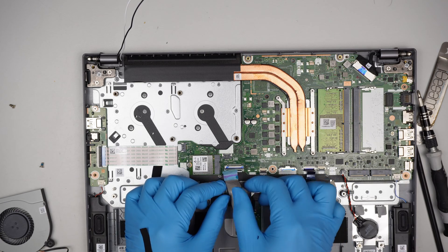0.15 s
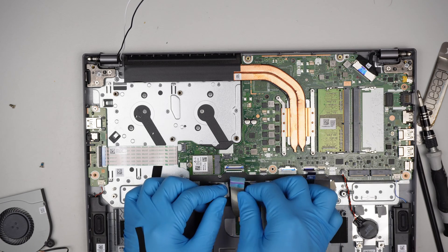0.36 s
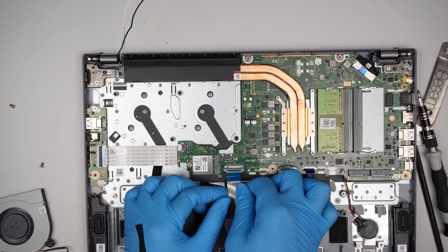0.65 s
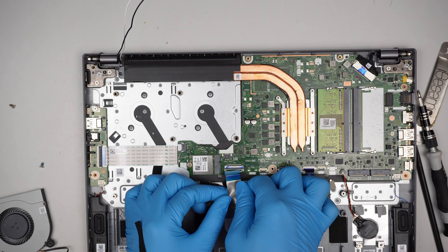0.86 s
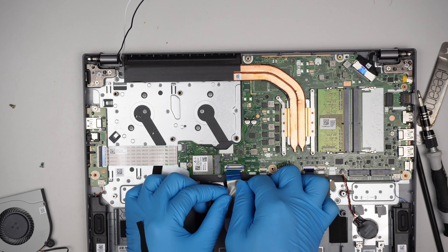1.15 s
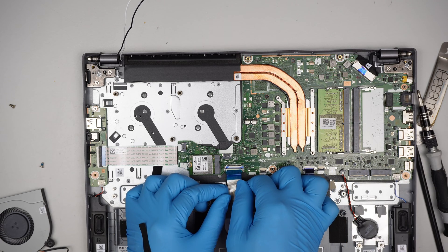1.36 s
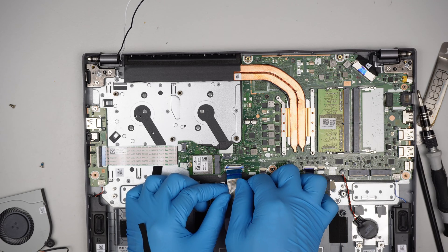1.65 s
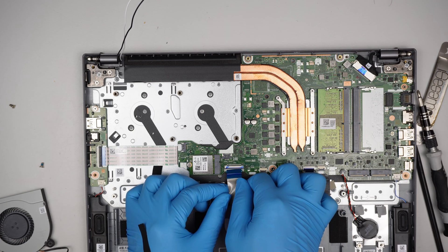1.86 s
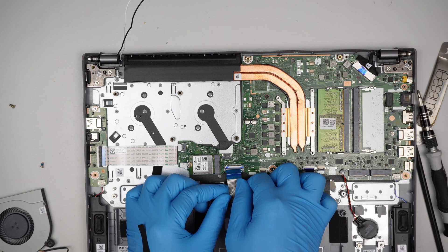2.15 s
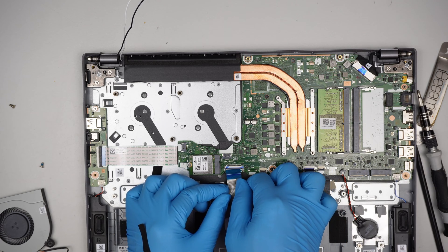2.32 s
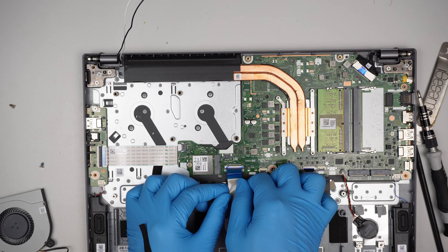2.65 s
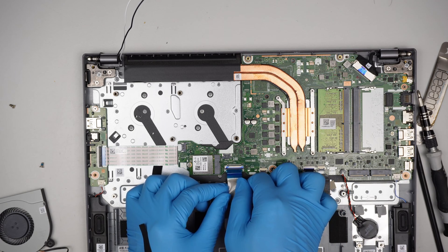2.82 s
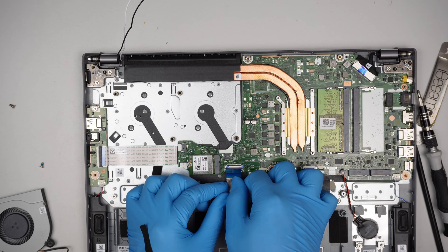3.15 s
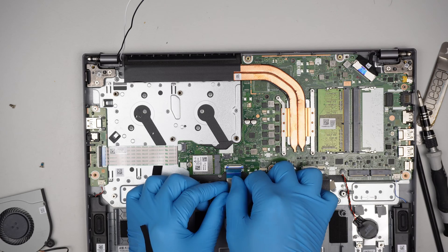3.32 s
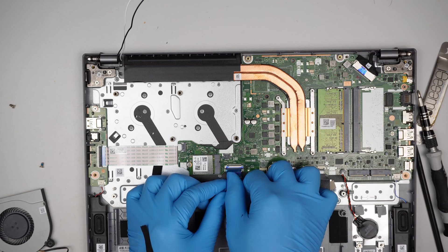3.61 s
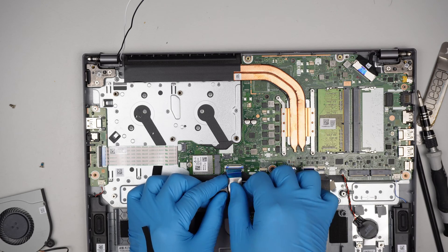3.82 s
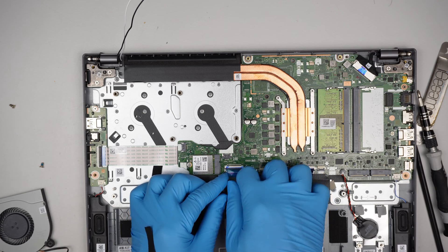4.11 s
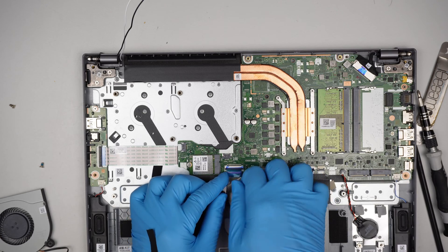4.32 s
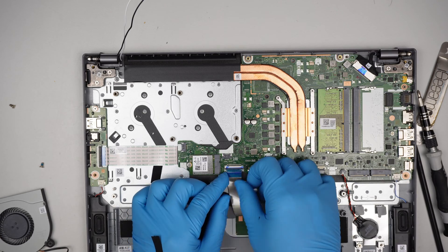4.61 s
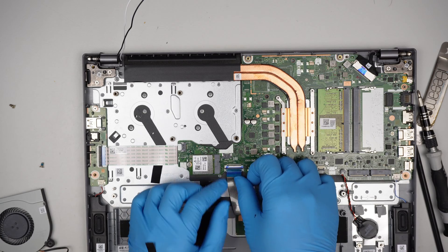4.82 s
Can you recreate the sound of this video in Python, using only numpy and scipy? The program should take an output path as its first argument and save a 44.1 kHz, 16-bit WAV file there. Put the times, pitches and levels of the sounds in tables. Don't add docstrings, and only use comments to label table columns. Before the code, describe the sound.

Close stereo handling of a flat cable on a circuit board in a small, quiet room. A quick flurry of plastic ticks and glove scuffs starts it, then a short creak, then mostly quiet with tiny clicks. A latch snaps near two seconds. After faint pressing, scraping and a hard click come near four seconds, and a dense cluster of snaps, slips and thin squeaks ends it. A low motor hum pulses unevenly underneath.

```python
import sys
import numpy as np
from scipy import signal
from scipy.io import wavfile
from scipy.ndimage import uniform_filter1d

SR = 44100
rng = np.random.default_rng(int(sys.argv[2]) if len(sys.argv) > 2 else 0)


def level_to_linear(level):
    exponent = np.asarray(level, float) / 20
    return 10 ** exponent


def unload_audio(sound):
    columns = np.transpose(np.atleast_2d(sound))
    steps = np.round(np.clip(columns, -1, 1) * 32767)
    wavfile.write(sys.argv[1], SR, steps.astype(np.int16))


N = 219221
LEFT_RIGHT = np.array([[1], [-1]])

# (pitch_hz, level_db_per_hz)
HUSH_COLOUR = [(400, -1), (640, -9), (900, -5), (2000, -14), (3600, -18), (7000, -37), (16000, -40)]
# (pitch_hz, t60_s, level_db)
ROOM_TAIL = [(711, 0.72, -23.5), (1300, 0.46, -25.5), (2602, 0.37, -31), (4240, 0.16, -32.5),
             (6600, 0.2, -35), (10800, 0.26, -28)]
# (start_s, rustle_db)
PALM_WEIGHT = [(0.0, -78.5), (0.23, -73.5), (0.64, -74.5), (1.15, -90.5), (1.27, -70.5), (1.3, -79.5),
               (1.99, -81.5), (2.23, -70.5), (2.32, -77.5), (3.46, -76.5), (3.5, -72), (3.71, -77.5),
               (3.81, -64.5), (4.06, -73.5), (4.57, -61.5), (4.58, -68), (4.96, -63), (4.97, -74)]
# (peak_s, peak_db, ring_hz)
DESK_KNOCKS = [(0.25, -57.5, 230), (0.387, -56.5, 215), (0.549, -64, 330), (0.697, -59, 231.5),
               (1.269, -60.5, 350), (1.407, -67, 629), (1.647, -66.5, 760), (2.778, -66.5, 360),
               (3.113, -63.5, 859), (3.507, -52, 233.5), (3.623, -58.5, 323.3), (.02, -56.5, 877),
               (0.048, -59.5, 988), (4.38, -59, 800), (4.552, -62.5, 792), (4.581, -60, 790),
               (4.948, -47.5, 934),
               (0.383, -59, 207), (0.542, -65, 303), (0.616, -62, 172), (0.691, -64, 214.8),
               (1.264, -58, 363), (1.606, -65, 171.4), (2.157, -56, 171), (2.228, -58, 205),
               (2.542, -62, 172), (2.687, -61, 228.6), (3.012, -65, 191), (3.361, -67, 180),
               (3.504, -54, 240.5), (3.572, -62, 358), (3.732, -63, 372), (3.787, -65, 172.6),
               (3.855, -56.5, 377), (4.093, -66, 386), (4.253, -54.5, 183), (4.393, -55, 186),
               (4.453, -58, 183), (4.508, -52.5, 194), (4.619, -61, 172), (4.76, -59, 213),
               (4.818, -56.5, 347), (4.873, -66, 171.6)]
# (peak_s, peak_db, rise_ms, fall_ms); rise and fall span 20 dB
HUM_SWELLS = [(.29, -49, 38, 190), (.495, -49.5, 105, 134), (.87, -47.5, 470, 75), (.93, -67, 34, 450),
              (1.22, -49.5, 77, 150), (1.42, -38.5, 51, 79), (1.52, -52, 220, 370), (1.73, -46.5, 140, 105),
              (1.94, -45.5, 73, 113), (2.16, -38.5, 98, 280), (2.27, -36, 170, 92), (2.5, -42.5, 190, 87),
              (2.69, -50, 193, 74), (2.86, -43, 79, 180), (2.96, -44.5, 160, 170), (3.06, -41.5, 166, 165),
              (3.22, -45.5, 168, 110), (3.43, -48, 320, 88), (3.59, -50.5, 120, 250), (3.81, -43, 120, 330),
              (3.98, -38.5, 320, 160), (4.12, -38.5, 57, 290), (4.26, -43, 130, 650),
              (4.42, -40.5, 930, 130), (4.56, -40, 930, 200), (4.71, -38, 960, 130),
              (4.87, -40.5, 65, 1000), (4.97, -38.5, 400, 200)]
# (multiple, level_db)
HUM_OVERTONES = [(1, -15.5), (3, -0.5), (4, -5), (5, -17), (6, -23)]
# (peak_s, lift_db, width_ms)
HUM_OPENINGS = [(0.513, 12.5, 5.6), (0.554, 9, 14.6), (1.411, 2, 8.1), (1.791, 10.5, 4.4),
                (2.691, 11.5, 6.2), (2.847, 9, 5.8), (2.881, 10, 8.1), (2.98, 8, 6.3), (3.047, 11, 7),
                (3.237, 7.5, 4.7), (4.261, 6, 5.6), (4.522, 11, 2.1)]
# (pitch_hz, width_hz, level_db)
LOW_MODES = [(730, 200, -6.5), (970, 220, 0.5), (1250, 100, 2.5), (1496, 190, 1.5)]
CHASSIS_MODES = [(1750, 300, -5), (2020, 220, 0), (2280, 260, -3)]
MID_MODES = [(2850, 520, -2), (3500, 550, -4), (4080, 450, -1), (4850, 600, -2), (5800, 750, -5),
             (6750, 650, -7), (7650, 600, -12)]
HIGH_MODES = [(6800, 3000, 4.5), (8750, 550, 6), (9630, 2900, -3.5), (12800, 5900, -12), (14800, 1500, -12)]
# (peak_s, peak_db, rise_ms, fall_ms, favoured_hz)
PRESSES = [(1.212, -75.5, 59, 110, 3140), (2, -73.5, 18, 140, 4100), (1.9, -77.5, 61, 530, 1450),
           (2.396, -63.5, 14, 52, 2420), (2.42, -72, 12.2, 290, 3200), (3.2, -67, 90, 100, 910),
           (3.15, -70, 110, 270, 1700), (2.837, -66.5, 55, 200, 1900), (2.887, -64, 130, 170, 2700),
           (3.03, -64.5, 150, 140, 2600), (3.08, -62.5, 150, 160, 3750), (3.1, -71, 30, 77, 5700),
           (3.3, -76, 46, 110, 6700), (3.326, -62, 4.8, 75.6, 4000), (4.2, -61, 87, 95, 4320),
           (3.45, -69, 200, 110, 2800), (4, -66, 260, 190, 2750), (3.55, -69, 230, 320, 4820),
           (4, -75.5, 42, 140, 7650), (3.22, -72, 37, 240, 4000), (2.1, -78.5, 66, 80, 3600),
           (1.95, -78, 100, 100, 1000), (1.2, -78, 55, 60, 4100), (.62, -78, 36, 80, 2200)]
# (start_s, pitch_hz, level_db)
SQUEAKS = [
    [(4.47, 9470, -64), (4.626, 9800, -68.5), (4.704, 10560, -57), (4.71, 10484, -97),
     (4.715, 10460, -57.5)],
    [(4.8, 10460, -57.5), (4.87, 9630, -67.5), (4.892, 9590, -64), (4.905, 9600, -74)],
]
# (peak_s, peak_db, rise_ms, fall_ms,
# treble_db)
STROKES = [(0.019, -51, 26, 26, -2.5), (.045, -59, 15, 90, -14), (0.113, -49.5, 37, 47, -7.5),
           (0.2, -50, 36, 55, -9), (0.739, -88, 126, 600, -16.5), (3.708, -63.5, 47, 8, -33.5),
           (2.125, -70, 3, 110, 5), (4.009, -48.5, 26, 14, -11.5), (4.285, -70.5, 110, 68, -14),
           (4.361, -60, 49, 110, -49), (4.378, -50, 8.8, 31, -6), (4.409, -48.5, 22, 38, 3),
           (4.431, -48, 53, 8.8, 0.5), (4.444, -57, 20, 54, -25), (4.695, -63, 33, 8.7, -14),
           (4.522, -61, 93, 150, -19.5), (4.6, -72, 100, 44, -21), (4.665, -69, 8.9, 35, -30),
           (4.71, -58.5, 39, 35, 5), (4.767, -46.5, 93, 34, 0), (4.797, -39, 5, 66, -11),
           (0.818, -68, 23, 26, 1.5), (0.855, -67, 16, 59, 1), (4.921, -45, 85, 82, -15),
           (4.96, -53.5, 92, 200, -6)]
# (peak_s, peak_db, rise_ms, fall_ms, treble_db)
DRAGS = [(.297, -57.5, 95, 133, -14.5), (.45, -85.5, 180, 252, -15), (3.796, -44.5, 23.5, 70.5, -20),
         (3.828, -46, 16, 50, -14), (3.868, -70, 89, 197, -11), (3.959, -71, 76, 98, -39.5),
         (4.026, -52, 145, 25, -28), (4.097, -55, 18, 76, -11), (4.16, -93, 130, 181, 7),
         (3.772, -55, 10, 40, -30)]
# (start_s, level_db)
CREAKS = [
    [(0.262, -58), (0.288, -44), (0.302, -48), (0.31, -51.5), (0.33, -45.5), (0.344, -54), (0.365, -61),
     (0.39, -89)],
]
# (pitch_hz, width_hz, level_db)
CREAK_MODES = [(2000, 340, -2), (2750, 500, -9), (4220, 200, -6), (4600, 450, -3), (6860, 510, -15),
               (6540, 190, -18.5), (7900, 81, -25)]
# (start_s, slips_per_s, level_db)
JUDDERS = [
    [(3.80, 258, -60), (3.83, 235.8, -50), (3.86, 231.6, -49), (3.895, 225, -48.5), (3.93, 235.7, -48.5),
     (3.972, 215.7, -54), (3.99, 328.7, -48.5), (4.008, 500, -51)],
    [(4.806, 332.3, -47), (4.815, 309.8, -52), (4.83, 302.6, -48), (4.85, 302, -58)],
]
# (pitch_hz, width_hz, level_db)
JUDDER_MODES = [(1250, 250, -9), (1980, 380, 0), (2830, 320, -3), (3950, 420, -5), (4830, 330, -3),
                (5680, 400, -11), (6780, 450, -17)]
# (start_s, level_db)
RELEASES = [
    [(4.79, -66), (4.798, -43), (4.82, -50), (4.87, -50.5), (4.9, -55), (4.97, -51)],
]
# (pitch_hz, width_hz, level_db)
RELEASE_MODES = [(960, 200, -8.5), (1600, 220, 0), (2030, 300, -8), (2800, 350, -2), (3800, 500, -4)]
# (peak_s, peak_db, pitch_hz, width_ms)
CHIRPS = [(0.101, -49, 3900, 1), (0.1066, -40.5, 4100, 1.6), (0.115, -46, 4130, 1), (0.252, -60, 6400, 10),
          (0.279, -51, 2000, 2), (0.289, -42, 2000, 1.6), (0.297, -46, 2000, 1.7), (0.3167, -44, 1964, 2),
          (0.316, -42, 4530, 2), (0.329, -41.5, 4506, 2.1), (0.328, -44.5, 2650, 1.8),
          (0.343, -44.5, 2000, 2.7), (0.359, -46.5, 2000, 3.5), (0.77, -78, 4980, 8.5),
          (0.806, -62, 5300, 2), (0.817, -53, 6900, 1.2), (0.8195, -56, 5200, 1.5),
          (0.858, -51.5, 3170, 1.9), (2.064, -43, 3950, 2.2), (2.066, -48, 5400, 2),
          (2.0765, -40, 3970, 1.7), (2.083, -44.5, 3980, 1.6), (2.375, -58, 4100, 1),
          (3.7676, -46.5, 3994, .8), (3.777, -43, 4000, .8), (3.812, -42, 4070, 2.5),
          (3.822, -39, 4070, 2.3), (3.842, -46, 4800, 1.5), (4.778, -35, 2200, 1.8),
          (0.8532, -36, 3600, 0.8), (0.853, -50, 5660, 2.3), (1.6494, -49.5, 4280, 0.65),
          (1.65, -54.5, 2926, 0.83), (1.6501, -52.5, 853, 1), (1.689, -62, 4000, 1), (1.694, -50, 4130, .9),
          (1.7007, -42.5, 4170, 0.71), (1.704, -59.5, 4260, 1), (3.03, -70.5, 2887, 5.5),
          (3.06, -73, 6100, 3.6), (3.328, -64, 5310, 3.5), (3.365, -66.5, 3890, 3.9),
          (3.53, -79.5, 7800, 5.9), (3.58, -66, 2800, 4), (4.9145, -40.5, 13140, 0.91),
          (4.9147, -32, 6090, 0.92)]
# (start_s, peak_db, ring_hz, treble_db, length_ms)
SCUFFS = [(0.044, -46, 6540, -12, 6.8), (0.104, -52, 4040, -22, 9.7), (0.126, -50, 8200, 0, 0.95),
          (0.2055, -50, 3860, -19, 3.2), (0.517, -82, 2800, -12.5, 2.5), (0.8045, -55, 7100, -12, 6),
          (0.814, -56, 5240, -14, 6), (0.8475, -47, 3840, -17, 6.2), (2.0558, -54.5, 3800, -18, 0.54),
          (2.0622, -43.5, 4070, -24, 7.6), (2.0738, -41, 3840, -31, 5.8), (2.1, -46, 2800, -20, 11),
          (2.3756, -55, 4220, -33, 12.7), (2.3843, -57.5, 2180, -22.5, 9.4),
          (2.874, -54.5, 2690, -42.5, 17.5), (3.694, -53, 4220, -15, 42), (3.748, -49.5, 4270, -17.5, 54),
          (3.785, -38, 3940, -24, 28), (4.065, -42.5, 1250, -9, 6.8), (4.356, -43, 3900, -16, 5.3),
          (4.537, -48, 4600, -15, 5), (4.7444, -34.5, 3900, -19, 20), (4.758, -40, 3440, -21, 3.4),
          (4.797, -36, 2740, -20, 9.6)]
# (start_s, peak_db, ring_hz, treble_db, low_mid_db)
TICKS = [(0.0044, -33, 2200, -21, -39), (0.0175, -29.5, 6900, -16, -13), (0.088, -22, 3600, -4.5, -13),
         (0.1703, -37, 3780, -28, -28), (0.1913, -31, 1044, -33, -32), (0.259, -36.5, 1300, -25, -11),
         (0.285, -42, 2000, -7, -23), (0.851, -37.5, 3930, -24, -12.5), (1.6483, -45, 4220, -46, -13),
         (1.6995, -49, 4220, -42, -46), (3.3245, -58, 5700, -30, -29), (4.0148, -17.5, 4027, -7, -14),
         (4.0792, -26.5, 5550, -13, -12.5), (4.3008, -27.5, 3960, -16.5, -29), (4.4928, -48, 4100, -8, -12),
         (4.5513, -30.5, 2760, -21.5, -25), (4.576, -36, 2860, -18, -30), (4.664, -36, 2520, -18, -36),
         (4.719, -21.5, 5330, 7.5, -25), (4.7222, -14, 3710, -9, -21.5), (4.7704, -19.5, 3170, -7, -44),
         (4.9129, -28.5, 3880, -2, -10)]
# (start_s, peak_db, ring_hz, treble_db, low_mid_db)
LATCH = [
    (2.1145, -13.5, 2224, -8, -19),
]
# (pitch_hz, level_db)
MASKED_TREBLE = [(8500, -40), (10500, -29), (15500, -26)]
# (pitch_hz, level_db)
HEARING_FLOOR = [(8500, -116), (10500, -108), (15500, -108)]

CONTACT_SHIFT_DB = 3.5


def unit(x):
    return x / np.sqrt(np.mean(x ** 2))


def ring(x, hz, width):
    return signal.lfilter(*signal.iirpeak(hz, hz / max(width, 1.), fs=SR), x)


def walk(rate):
    k = int(SR / rate)
    held = np.repeat(rng.standard_normal(N // k + 1), k)
    return unit(uniform_filter1d(held, k)[:N])


def pulse(t, s, width_ms):
    return np.exp(-((t - s) * 1000 / width_ms) ** 2 / 2)


def curves(spans, rest):
    t = np.arange(N) / SR
    out = np.tile(np.array(rest, float)[:, None], N)
    for s, *columns in map(np.transpose, spans):
        on = (t >= s[0]) & (t <= s[-1] + 1 / 500)
        out[:, on] = [np.interp(t[on], s, c) for c in columns]
    return out


def swells(rows):
    s, db, rise_ms, fall_ms = np.transpose(rows)[:4, :, None]
    late_ms = np.arange(N * 1000 // SR + 2) - s * 1000
    return db - 20 * np.maximum(-late_ms / rise_ms, late_ms / fall_ms)


def full(x):
    return np.interp(np.arange(N) / SR * 1000, np.arange(len(x)), x)


def body(x, modes, shift_db=0):
    gain = np.sqrt(sum(level_to_linear(db) ** 2 * np.pi * width / SR / 2 for _, width, db in modes))
    out = 0
    for k, (hz, width, db) in enumerate(modes):
        favour = level_to_linear(shift_db * walk(14)) if shift_db else 1
        out = out + (-1) ** k * level_to_linear(db) * ring(ring(x * favour, hz, width), hz, width)
    return out / gain


def board(low, chassis, mid, high, shift_db=0):
    groups = (LOW_MODES, CHASSIS_MODES, MID_MODES, HIGH_MODES)
    return sum(body(x, modes, shift_db) for x, modes in zip((low, chassis, mid, high), groups))


def grains(patchy_db, spiky_db, count):
    shared = patchy_db * walk(54)
    forces = []
    for _ in range(count):
        level_db = shared + 1.5 * walk(150) + spiky_db * rng.exponential(size=N)
        forces.append(unit(level_to_linear(level_db) * rng.standard_normal(N)))
    return forces


def hush():
    out = 0
    hz_points, db_points = np.transpose(HUSH_COLOUR)
    for hz in 450 * 2 ** np.arange(0, 5.2, .4):
        mid, side = ring(rng.standard_normal((2, N)), hz, hz / 3)
        db = np.interp(np.log(hz), np.log(hz_points), db_points) + 2.2 * walk(10.0)
        out = out + level_to_linear(db) * (mid + 0.99 * side * LEFT_RIGHT)
    return unit(out) * level_to_linear(-84.5)


def room(x):
    out = 0
    for hz, t60, db in ROOM_TAIL:
        keep = level_to_linear(-120 / (t60 * SR))
        energy = signal.lfilter([1 - keep], [1, -keep], ring(x, hz, hz * 0.16) ** 2)
        noise = rng.standard_normal((2, N))
        mid, side = unit(ring(ring(noise, hz, hz * 0.8), hz, hz * 0.8))
        late = np.sqrt(uniform_filter1d(energy, size=401, origin=200) + 1e-18)
        out = out + level_to_linear(db + 14.5) * late * (mid + side * LEFT_RIGHT)
    return out


def palms():
    rub = rng.standard_normal((2, 2, N))
    rustle = unit(ring(ring(rub[0], 170, 200), 170, 300))
    for hz, db in [(240, -14), (340, -9), (430, -10)]:
        hollow = unit(ring(ring(rub[1], hz, hz / 4), hz, hz / 2))
        rustle = rustle + level_to_linear(db + 3.5 * walk(8)) * hollow
    weight_db = curves([PALM_WEIGHT], [-120])[0]
    rustle = rustle * level_to_linear(weight_db - 2.5 + 2.0 * walk(30))
    t = np.arange(N) / SR
    knocks = sum(level_to_linear(db) * np.sin(2 * np.pi * hz * t) * pulse(t, s, 3.8)
                 for s, db, hz in DESK_KNOCKS)
    return knocks + rustle[0] + level_to_linear(-8.0) * rustle[1] * LEFT_RIGHT


def hum():
    shaft_hz, shut_db = 30.04, -78.5
    db = full(np.maximum(swells(HUM_SWELLS).max(axis=0), shut_db))
    over_db = -6 - 0.22 * (db + 50)
    t = np.arange(N) / SR
    lift = sum(lift_db * pulse(t, s, ms) for s, lift_db, ms in HUM_OPENINGS)
    turn = 2 * np.pi * shaft_hz * t
    overtones = sum(level_to_linear(line_db + 1.9 * walk(22)) * np.cos(k * turn + 1.5 * walk(20))
                    for k, line_db in HUM_OVERTONES)
    main = level_to_linear(2.2 * walk(20)) * np.cos(2 * turn + .4 * walk(12))
    return level_to_linear(db - 1.5 + lift) * (main + level_to_linear(over_db + lift / 2) * overtones)


def press():
    lines = swells(PRESSES)
    soft, drift = grains(1.5, 1.2, count=2)
    soft = soft * full(level_to_linear(lines.max(axis=0)))
    waver = 3 * walk(14)
    streaks = 0
    for k, (line, (*_, hz)) in enumerate(zip(lines, PRESSES)):
        touch = drift * level_to_linear(full(line) + np.roll(waver, 9001 * k))
        streaks = streaks + ring(ring(touch, hz, hz / 13), hz, hz / 9)
    patches = 0
    for hz in 750 * 2 ** np.arange(0, 3.4, .3):
        db = -6.5 * np.log2(hz / 1900) ** 2 + 4 * walk(13)
        patches = patches + level_to_linear(db) * ring(ring(soft, hz, hz / 4), hz, hz / 2)
    return level_to_linear(3.0) * patches + level_to_linear(8.5) * streaks


def squeak():
    hz, db = curves(SQUEAKS, [10000, -130])
    wobble = 1 + 0.00077 * walk(190)
    level = level_to_linear(uniform_filter1d(db, size=300) + 2 + 2.6 * walk(120))
    return level * np.sin(2 * np.pi * np.cumsum(hz * wobble) / SR)


def slides():
    glove, drag = level_to_linear(swells(STROKES)), level_to_linear(swells(DRAGS))
    treble = level_to_linear(np.array(STROKES + DRAGS)[:, -1]) @ np.vstack([glove, drag])
    glove, drag = full(glove.sum(axis=0)), full(drag.sum(axis=0))
    low, chassis, mid, high = grains(1.6, 2.2, count=4)
    low = low * (level_to_linear(-12) * glove + level_to_linear(-10.5) * drag)
    chassis = chassis * (level_to_linear(-9.5) * glove + level_to_linear(-2) * drag)
    mid = mid * (glove + drag)
    high = level_to_linear(-1.0) * ring(high * full(treble), 7100, 7000)
    return board(low, chassis, mid, high, CONTACT_SHIFT_DB)


def creak():
    level = level_to_linear(curves(CREAKS, [-120])[0])
    return body(grains(2.5, 1.5, count=1)[0] * level, CREAK_MODES)


def judder():
    rate, db = curves(JUDDERS, [200, -140])
    turns = np.cumsum(rate * (1 + .06 * walk(230))) / SR
    slips = np.diff(np.floor(turns), prepend=0) > 0
    force = slips * np.sqrt(SR / rate) * level_to_linear(db + 1.2 * rng.standard_normal(N))
    rattle = signal.lfilter([1], [1, -.97], force) * rng.standard_normal(N)
    return body(force + level_to_linear(-18) * rattle, JUDDER_MODES)


def release():
    level = level_to_linear(curves(RELEASES, [-120])[0])
    return body(grains(2.3, 2, count=1)[0] * level, RELEASE_MODES, CONTACT_SHIFT_DB)


def chirps():
    t = np.arange(N) / SR
    return sum(level_to_linear(db) * np.sin(2 * np.pi * hz * t) * pulse(t, s, ms) for s, db, hz, ms in CHIRPS)


def contacts(events, rise_ms, own_db, q, chassis_db, grain_db):
    size = 4096
    force, own = np.zeros((4, N + size)), np.zeros(N + size)
    t_ms = np.arange(size) / SR * 1000
    for s, db, hz, high_db, low_db, ms in events:
        chance = rng.standard_normal((2, size))
        fall = np.exp(-t_ms / max(ms, .3)) + level_to_linear(-23) * np.exp(-t_ms / 11)
        burst = chance[0] * level_to_linear(grain_db * chance[1]) * np.minimum(t_ms / rise_ms, 1) * fall
        burst = burst / np.sqrt(np.mean(burst[:128] ** 2))
        i = max(int((s - rise_ms / 1000) * SR), 0)
        soft_db = min(high_db + 22, 0) * .4
        cutoff_hz = min(19000 * level_to_linear(1.9 * soft_db), .45 * SR)
        push = signal.lfilter(*signal.butter(4, cutoff_hz, fs=SR), burst)
        group_db = np.array([[low_db], [chassis_db + soft_db], [-0.5 + soft_db], [high_db]])
        force[:, i:i + size] += level_to_linear(db - 12.5 + group_db) * np.array([push, push, push, burst])
        part = ring(ring(push, hz, hz / q), hz, hz / 2)
        own[i:i + size] += level_to_linear(db + own_db) * part / np.abs(part).max()
    return board(*force[:, :N]) + own[:N]


def scuffs():
    events = [(*row, -25.5, ms) for *row, ms in SCUFFS]
    return contacts(events, rise_ms=2.7, own_db=0.0, q=16, chassis_db=-22.5, grain_db=4.5)


def ticks():
    late_s, tick_ms, latch_ms = .0012, 0.86, 3.7
    events = [(s + late_s, *row, tick_ms) for s, *row in TICKS]
    events += [(*row, latch_ms) for row in LATCH]
    return contacts(events, rise_ms=1.3, own_db=-7.5, q=11.0, chassis_db=-11.0, grain_db=2.0)


def scene():
    hands = ticks() + scuffs() + slides() + press() + creak() + judder() + chirps() + release()
    close = hands + squeak()
    apart = level_to_linear(-6.5) * ring(np.roll(close, 9), 11000, 8400)
    scatter = rng.standard_normal(400) * np.exp(-np.arange(400) / 90) / 7
    apart = apart + level_to_linear(-16.5) * signal.fftconvolve(hands, scatter)[:N]
    left_db = -1.3
    stereo_hands = close * level_to_linear(left_db / 2 * LEFT_RIGHT) + apart * LEFT_RIGHT
    return stereo_hands + room(hands) + hum() * level_to_linear(-.12 * LEFT_RIGHT) + palms() + hush()


def thin_treble(x):
    hz, _, frames = signal.stft(x, SR, nperseg=1024)
    power = np.mean(np.abs(frames) ** 2, axis=0)
    mid = power[(hz > 1500) & (hz < 6000)].mean(axis=0)
    for low_hz in np.arange(8400, 17000, 700):
        band = (hz >= low_hz) & (hz < low_hz + 700)
        chance_db = np.repeat(5 * rng.standard_normal(len(mid) // 3 + 1), 3)[:len(mid)]
        masked = mid * level_to_linear(np.interp(low_hz, *np.transpose(MASKED_TREBLE))) ** 2
        unheard = level_to_linear(np.interp(low_hz, *np.transpose(HEARING_FLOOR))) ** 2
        frames[:, band] *= power[band].mean(axis=0) * level_to_linear(chance_db) > masked + unheard
    return signal.istft(frames, SR, nperseg=1024)[1][:, :N]


def top_cut(x):
    return signal.sosfilt(signal.butter(12, 16500, fs=SR, output="sos"), x)


def record(dry):
    hiss = level_to_linear(-99.5) * rng.standard_normal(dry.shape)
    mix = thin_treble(dry) + hiss
    return top_cut(mix)


dry = scene()
out = record(dry)
unload_audio(out)
```